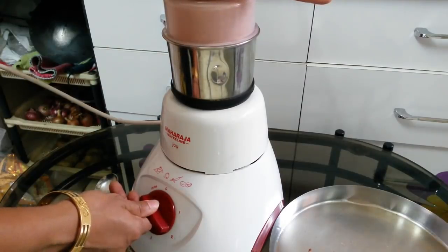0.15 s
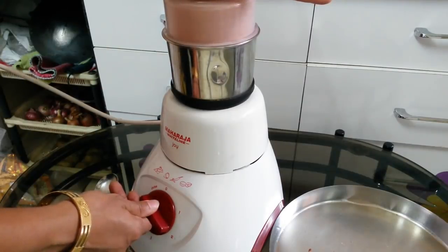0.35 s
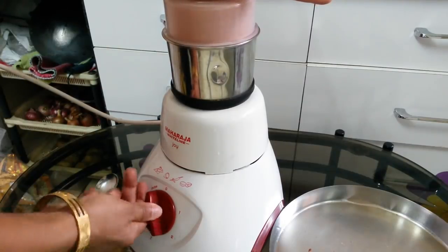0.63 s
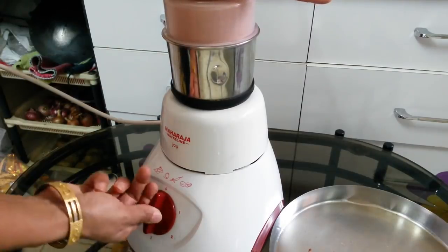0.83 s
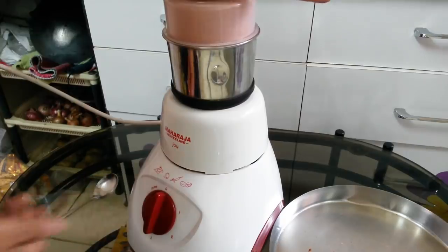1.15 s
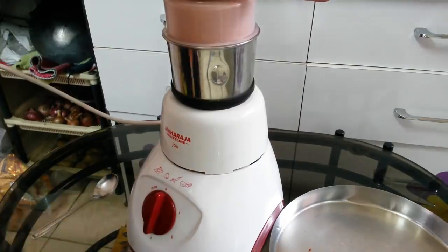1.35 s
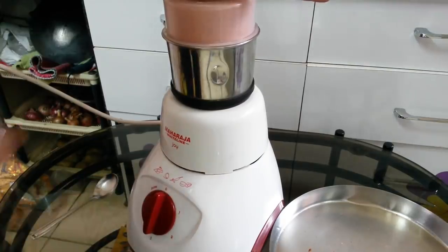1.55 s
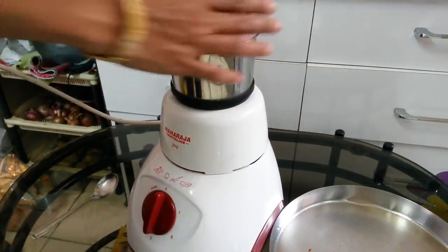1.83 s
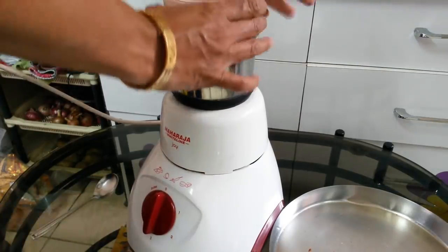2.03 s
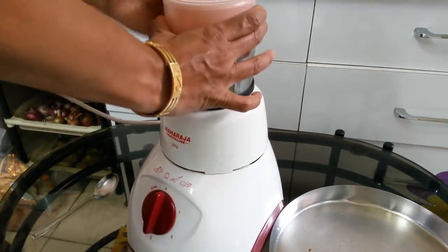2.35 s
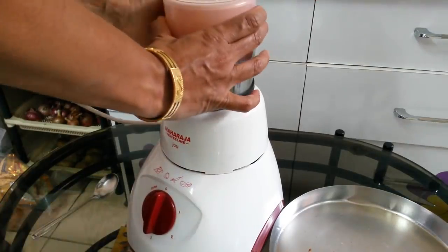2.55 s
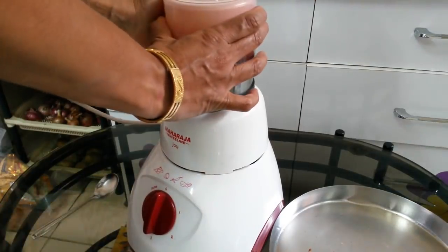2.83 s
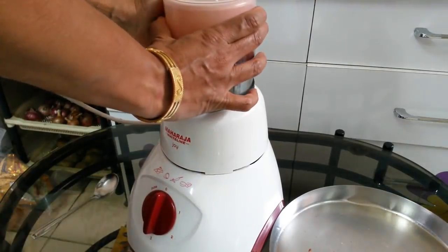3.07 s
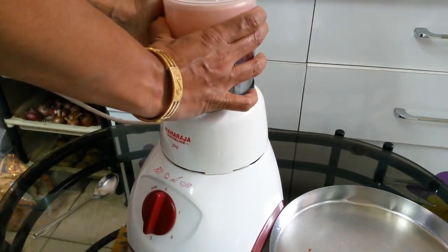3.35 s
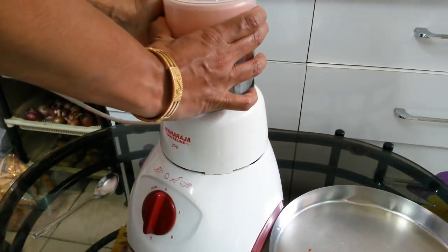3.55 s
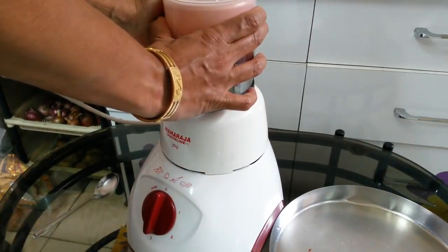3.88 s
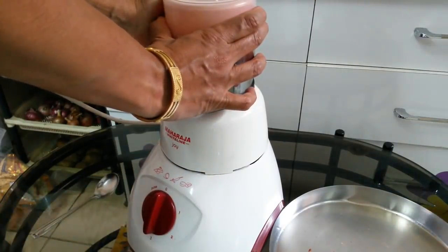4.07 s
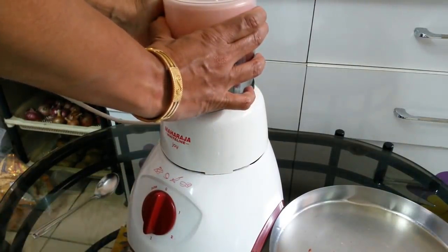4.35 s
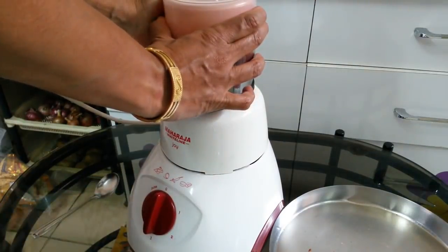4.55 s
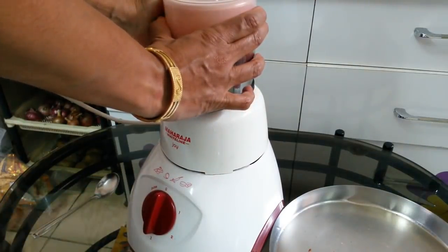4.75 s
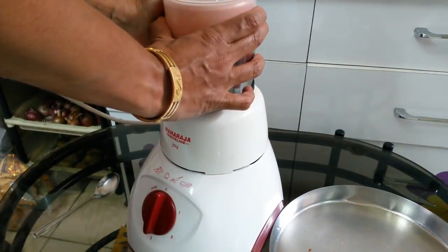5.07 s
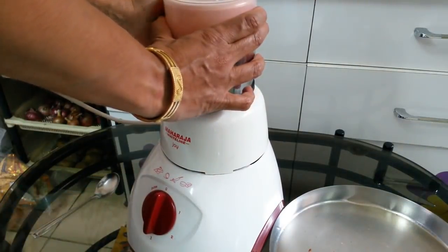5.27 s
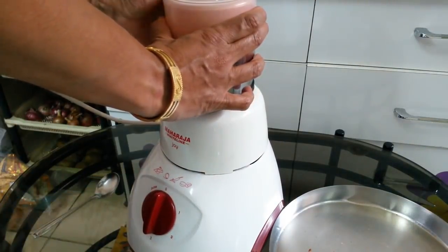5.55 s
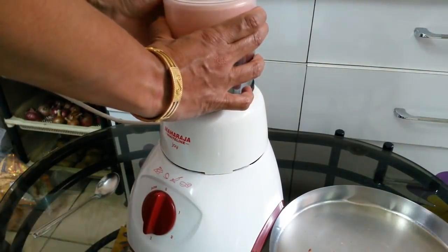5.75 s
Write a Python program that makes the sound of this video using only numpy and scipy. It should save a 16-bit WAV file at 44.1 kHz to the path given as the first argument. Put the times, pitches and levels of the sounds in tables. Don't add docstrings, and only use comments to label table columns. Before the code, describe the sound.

A small high-speed grinder fills the whole stretch with dense rushing noise and a buzzing motor whine. Small ticks come early, then a sharp knob click and short sag before the motor speeds up within a second. Dry grains hiss against metal as held-jar resonance strengthens. Very close, bright, thin-bassed stereo indoors, with short hard reflections and slightly overloaded peaks.

```python
import sys
import numpy as np
from scipy import signal
from scipy.fft import rfft, irfft
from scipy.io import wavfile
from scipy.ndimage import uniform_filter1d

SR = 44100
rng = np.random.default_rng(int(sys.argv[2]) if len(sys.argv) > 2 else 0)


def unload_wav(signal):
    wavfile.write(
        sys.argv[1],
        SR,
        np.round(np.clip(np.atleast_2d(signal).T, -1, 1) * 32767).astype(np.int16),
    )


def decibels_to_gain(level_db):
    exponent = np.asarray(level_db, float) / 20
    return 10 ** exponent


N = 260631
T = np.arange(N) / SR
HZ = np.maximum(np.arange(N // 2 + 1) * SR / N, 1)
SIDES = np.array([[0.5], [-0.5]])
LAG = 2.4
# (time [s], level [dB])
LOAD = [(0.0, -20), (0.05, -20), (0.06, -19), (0.62, -18.5), (0.84, -19.5), (1.33, -19.5), (1.4, -20.5),
        (1.81, -19), (1.87, -20), (2.42, -18), (3.36, -18.5), (3.65, -17.5), (3.8, -20), (4.05, -18),
        (5.86, -17), (5.91, -18.5)]


def motor():
    # (time [s], speed [Hz], unbalance [dB])
    shaft = [(0, 259.8, -29.5), (0.5, 261.1, -31), (0.74, 260.4, -29), (0.89, 253.8, -29),
             (1.03, 262.4, -29.5), (1.2, 267.6, -32), (1.38, 272, -37), (1.55, 273.7, -29.5),
             (1.85, 274.9, -34), (2.3, 274.6, -28), (2.75, 276.3, -31.5), (3.05, 275.8, -30),
             (3.4, 275.6, -28.5), (3.95, 275.5, -30), (4.3, 276.4, -27), (4.8, 275.4, -28), (5.6, 275, -27),
             (5.91, 276.4, -29)]
    # (multiple [1], offset from pulsing mains torque [Hz], left and right at the low step [dB, dB],
    # left and right at the high step [dB, dB], wobble [dB])
    orders = [(1, 0, -1.3, 2.2, -2.3, 2.7, 2), (7, 0, 2, 1, 4, -6, 3), (24, 0, 3, -2, 1, 2, 2.5),
              (1, -100, -47, -45, -45, -44, 5), (1, 100, -53, -47, -49, -42, 5),
              (2, 0, -51, -49, -45, -41, 3), (2, 100, -50, -52, -48, -54, 4), (3, 0, -60, -54, -54, -41, 3),
              (3, 100, -48, -46, -43, -46, 4), (4, 0, -44, -41, -60, -58, 4), (5, 0, -60, -60, -44, -46, 4),
              (8, 0, -52, -46, -54, -42, 4), (7, -100, -42, -44, -46, -50, 4),
              (12, 0, -43, -44, -48, -45, 3), (29, 0, -54, -54, -46, -46, 3),
              (36, 0, -52, -45, -48, -42, 3)]
    # (time of the top [s], length [s], fan [dB], commutator [dB])
    grips = [(.52, 0.36, 2.5, -2), (.85, 0.13, -4, 0), (1.07, 0.11, 6, 0), (1.31, .15, 5, 0),
             (1.65, 0.49, -14, -3), (1.95, .3, 0, 4), (2.4, 0.29, -10, -3), (2.75, .2, 2, -6),
             (3.05, .2, -2, -9), (3.35, 0.57, -2, 1), (3.798, .3, -2, 0), (4.55, .4, 2, -2),
             (4.85, .2, 4.5, 1), (5.202, .4, -2, 3), (5.8, .5, -2, 4.5)]
    hz, unbalance_db = columns(shaft)
    hz = hz + 0.45 * walk(7)
    turn = 2 * np.pi * np.cumsum(hz) / SR
    fast = np.clip((T - 1.1) / 1.2, 0, 1)
    load_db = uniform_filter1d(columns(LOAD)[0], SR // 2)
    load_db = fast * (load_db - load_db[N // 2:].mean())

    grip_db = 0
    for s, length_s, fan, brush in grips:
        grip_db = grip_db + np.array([[fan], [brush]]) * bump(s, length_s / 2)
    fan_hz = orders[1][0] * hz
    fan_ring_db = 7 / (1 + (2 * (fan_hz - 1860) / 90) ** 2)
    fan_db = -38.5 + 3 * holding() + fan_ring_db
    brush_low_db, brush_high_db, brush_per_load = -41, -26, 1.5
    brush_db = brush_low_db + fast * (brush_high_db - brush_low_db) + brush_per_load * load_db
    main_db = np.array([unbalance_db, fan_db + grip_db[0], brush_db + grip_db[1]])
    swells = list(uniform_filter1d(decibels_to_gain(main_db), SR // 16)) + [decibels_to_gain(load_db)] * len(orders)

    out = 0
    for swell, (k, offset_hz, *db, wobble_db) in zip(swells, orders):
        slow_db, fast_db = np.reshape(db, (2, 2, 1))
        slip = 0.15 * np.sqrt(k) * walk(25) + 2 * np.pi * rng.random()
        late = k * hz * 2 * np.pi * LAG / SR * SIDES
        phase = k * turn + 2 * np.pi * offset_hz * T + slip - late
        shake = 0.8 * walk(22) + 0.4 * np.array([walk(16), walk(16)])
        wobble = wobble_db * (shake - uniform_filter1d(shake, SR // 4) - 0.08 * wobble_db)
        level = decibels_to_gain(slow_db + fast * (fast_db - slow_db) + wobble)
        out = out + np.sqrt(2) * swell * level * np.sin(phase)
    return out


def roar():
    centres_hz = [600, 2200, 6500, 11500]
    # (frequency [Hz], density [dB per Hz])
    colour = [(30, -48), (60, -73), (100, -75.5), (140, -62), (320, -56.5), (700, -59.5), (1200, -55),
              (1500, -54), (2800, -58), (4600, -59.5), (8500, -65.5), (10500, -60.5), (13000, -64),
              (14500, -67)]
    # (frequency [Hz], width [Hz], gain [dB])
    modes = [(172.2, 35.5, 10.5), (1770, 62, 3), (1846, 330, 2), (3274, 450, 4), (4720, 570, -2)]
    # (frequency [Hz], width [Hz], gain [dB])
    housing_rings = [(297, 24, 6), (330, 20, -4), (369, 20, 4), (425, 30, 3), (920, 40, 3), (1037, 36, 7),
                     (1150, 120, -3), (1410, 50, 3), (1492, 25, 5), (1540, 60, 4), (1720, 40, 3),
                     (1860, 60, 3)]
    # (frequency [Hz], width [Hz], gain [dB])
    jar_rings = [(2133, 45, 4), (2308, 45, 5), (2720, 25, 4), (3468, 30, 3), (5120, 60, 3), (5750, 60, 3),
                 (5890, 40, 3), (6070, 50, 2), (7550, 120, 3), (12100, 80, 6), (12900, 60, 4),
                 (13800, 60, 4)]
    # (frequency [Hz], left minus right [dB])
    ports = [(60, -7), (110, 5), (200, -6), (370, -7), (700, -4.5), (1300, -4), (2800, -7.5), (4500, -10.5),
             (8500, -18), (10500, -8), (13000, -11)]
    # (frequency [Hz], width [Hz], gain [dB])
    port_modes = [(6600, 4720, 23.36), (7400, 2340, 8.3)]
    # (frequency [Hz], likeness [0-1])
    likeness = [(60, 0.2), (130, 0.66), (290, 0.93), (630, 0.27), (1380, 0.4), (3030, 0.34), (6630, 0),
                (14500, 0.03)]
    alike = np.clip(along(likeness), 0, 1)
    air = rfft(rng.standard_normal((3, N)))
    fine = np.vstack([np.ones(N), rng.standard_normal((2, N))])
    chips = rfft(pelting(per_s=5000, scatter_db=3) * fine)
    share = 0.37 * HZ ** 2 / (HZ ** 2 + 4000 ** 2)
    drive = np.sqrt(1 - share) * air + np.sqrt(share) * chips
    late = np.exp(-2j * np.pi * HZ * LAG / SR * SIDES)
    pair = np.sqrt(alike) * drive[0] * late + np.sqrt(1 - alike) * drive[1:]
    pair = pair / np.sqrt((1 + alike) / 2)

    body_db = along(colour) + sum(hump(*mode) for mode in modes + housing_rings + jar_rings)
    port_db = along(ports) * SIDES + np.array([hump(*mode) for mode in port_modes])
    pair = pair * decibels_to_gain(body_db + port_db) * kitchen()
    levels, wall_db = layers()
    wall = irfft(pair.mean(axis=0) * (HZ > 1300) * (HZ < 4000), N)
    scale = decibels_to_gain(wall_db) / np.std(wall)

    out, swell = 0, walk(18)
    for octave in np.arange(5, 14.6, 0.5):
        band = np.cos(np.pi * np.clip(np.log2(HZ) - octave, -0.5, 0.5)) ** 2
        weight = [np.interp(octave, np.log2(centres_hz), row) for row in np.eye(4)]
        db = weight @ levels - 4 * T * max(octave - 13.3, 0)
        db = db + 0.71 * np.clip((octave - 9) / 4, 0.2, 1) * swell
        db = db + 2 * (octave == 11) * holding()
        out = out + irfft(pair * band, N) * decibels_to_gain(db + 0.26 * walk(20))
    return out * scale


def layers():
    # (load slope [dB per dB], drift [dB per s], spray slope [dB per dB])
    slopes = [
        (2.12, -0.5, 0.23),
        (0.86, 0.16, 0.1),
        (1.74, -0.05, -0.16),
        (0.7, 0.16, 1.52),
    ]
    # (time of the top [s], level [dB], length [s])
    sprays = [(0.024, 0.5, .05), (.66, 1, 0.22), (0.886, -1.5, .06), (1.51, 2, 0.04), (2.4, 1, .1),
              (2.882, 1.5, .06), (3.06, 2, 0.037), (3.19, 0, .08), (3.422, 2, 0.093), (4.44, 0, .1),
              (4.537, -1, .08), (4.62, -0.5, .08), (5.034, 2.5, 0.073), (5.535, 1.5, 0.11), (5.71, 1, 0.09)]
    load_db = columns(LOAD)[0]
    spray_db = sum(db * bump(s, length_s) for s, db, length_s in sprays)
    db = np.array(slopes) @ [load_db - load_db.mean(), T - T.mean(), spray_db]
    break_s, break_length_s, break_db = 0.848, 0.04, -4
    wall_db = load_db.mean() - 4.5
    return db + break_db * bump(break_s, break_length_s / 2), wall_db


def holding():
    return np.interp(T, (1.8, 2.4), (0, 1))


def pelting(per_s, scatter_db):
    hit = rng.random(N) < per_s / SR
    force = rng.standard_normal(N) * decibels_to_gain(scatter_db * rng.exponential(size=N))
    return unit(hit * force)


def ticks():
    # (time [s], peak [dB], frequency [Hz], left minus right [dB], length [s])
    clicks = [(.0152, -13, 8950, -4, .002), (0.58, -13.5, 9600, -4, 0.0026), (0.055, -14, 7400, -4, 0.0035),
              (.2683, -14, 6900, -7, 0.0049), (.3845, -9, 7400, -6, 0.0039), (0.8400, -5, 7600, -6, 0.0010),
              (.8402, -13, 10500, -6, .0008), (0.9, -16, 7800, -6, .0015), (1.498, -13, 6640, 1, 0.0034),
              (1.628, -21, 6430, -7, 0.0041), (2.5421, -22.5, 7200, 18, 0.0037),
              (3.17, -9, 7120, .5, 0.0034), (5.715, -14, 6750, 8, 0.0047)]
    out = np.zeros((2, N))
    for s, db, hz, pan_db, length_s in clicks:
        i, x = int(s * SR), np.arange(int(length_s * SR)) / SR
        ring = np.sin(2 * np.pi * hz * x) + 0.39 * np.sin(2 * np.pi * 1.9 * hz * x)
        out[:, i:i + len(x)] += decibels_to_gain(db + pan_db * SIDES) * ring * np.sin(np.pi * x / length_s)
    return out


def thuds():
    # (time [s], peak [dB], frequency [Hz], length [s])
    pushes = [
        (.59, -51, 110, 0.045),
        (.92, -39, 110, 0.034),
        (3.023, -28, 65.5, 0.024),
        (3.136, -28, 64.9, 0.022),
        (4.085, -33, 84.3, 0.034),
        (4.44, -40, 85, .04),
        (4.94, -48, 75, 0.039),
        (5.42, -31, 89.7, 0.063),
    ]
    out = np.zeros(N)
    for s, db, hz, length_s in pushes:
        x = np.clip((T - s) / length_s, 0, 1)
        out += decibels_to_gain(db) * np.sin(np.pi * x) ** 2 * np.sin(2 * np.pi * hz * (T - s))
    return out


def kitchen(count=14):
    delay_s = rng.uniform(0.003, 0.035, (count, 2, 1))
    echoes = sum(decibels_to_gain(-21 - 150 * d) * np.exp(-2j * np.pi * HZ * d) for d in delay_s)
    return (1 + echoes) / np.sqrt(1 + np.mean(abs(echoes) ** 2))


def hump(hz, width, gain_db):
    return gain_db / (1 + (2 * (HZ - hz) / width) ** 2)


def bump(s, length_s):
    return np.cos(np.pi * np.clip((T - s) / (2 * length_s), -0.5, 0.5)) ** 2


def walk(rate):
    k = int(SR / rate)
    held = np.repeat(rng.standard_normal(N // k + 1), k)
    return 1.06 * uniform_filter1d(uniform_filter1d(held, k), k)[:N]


def along(table):
    hz, value = np.transpose(table)
    return np.interp(np.log(HZ), np.log(hz), value)


def columns(table):
    s, *rest = np.transpose(table)
    return np.array([np.interp(T, s, c) for c in rest])


def unit(x):
    return x / np.sqrt(np.mean(x ** 2))


def scene():
    return motor() + roar() + ticks() + thuds()


def roll_off(x):
    return signal.sosfilt(signal.butter(12, 15130, fs=SR, output="sos"), x)


def record(dry):
    soft = np.tanh(1.4 * dry) / 1.4
    thin = signal.sosfilt(signal.butter(3, 130, "high", fs=SR, output="sos"), soft)
    thin = signal.sosfilt(signal.ellip(10, 0.2, 70, 14450, fs=SR, output="sos"), thin)
    return roll_off(thin)


dry = scene()
out = record(dry)
unload_wav(out)
```